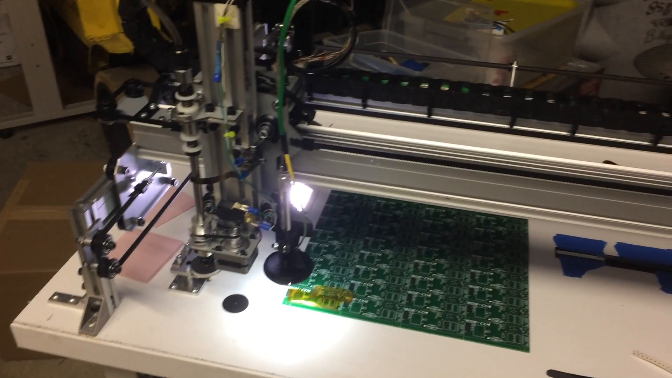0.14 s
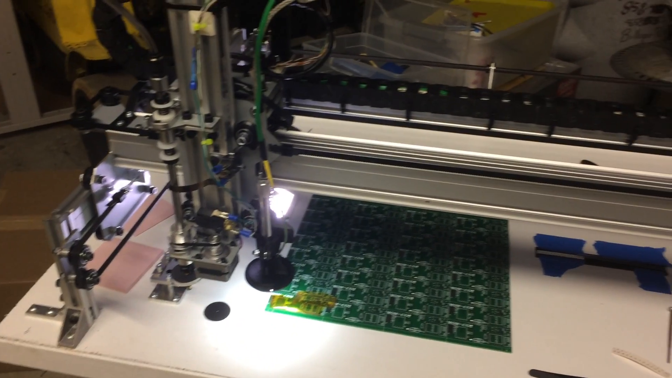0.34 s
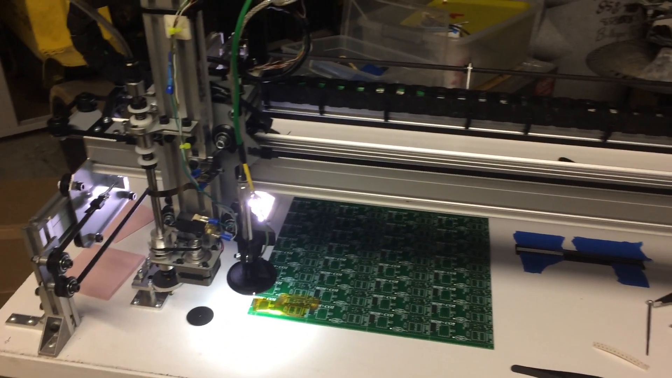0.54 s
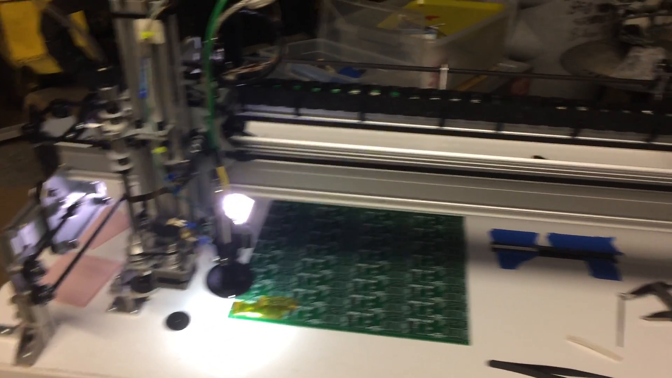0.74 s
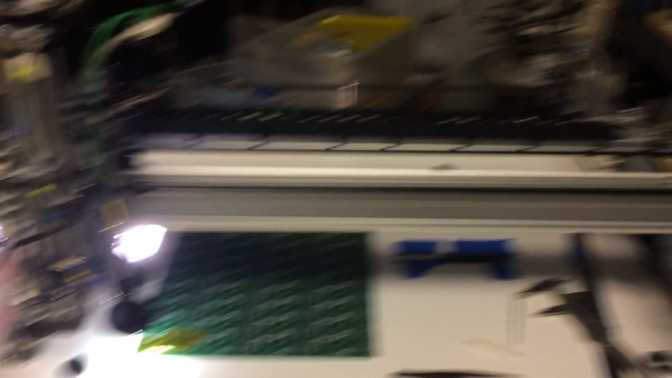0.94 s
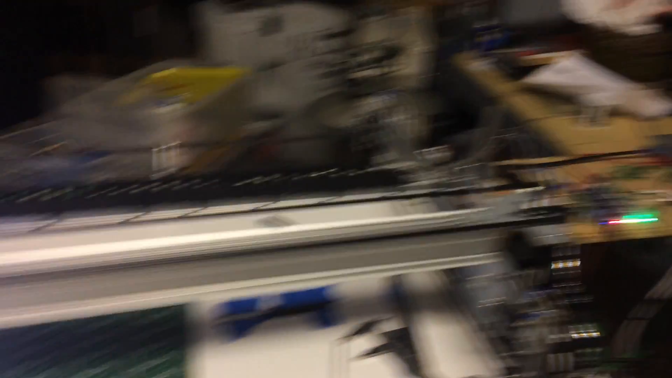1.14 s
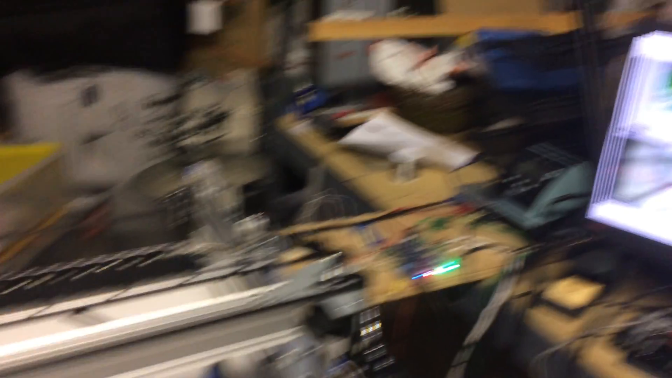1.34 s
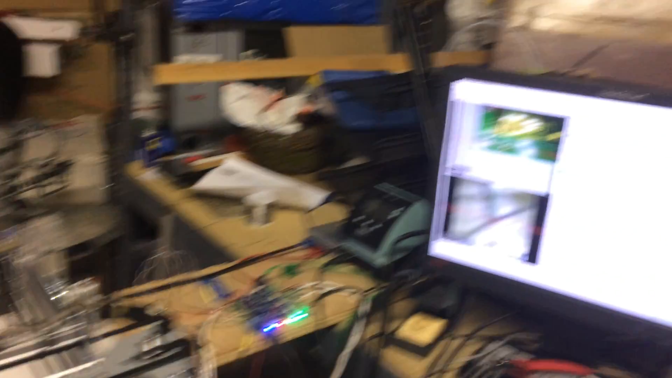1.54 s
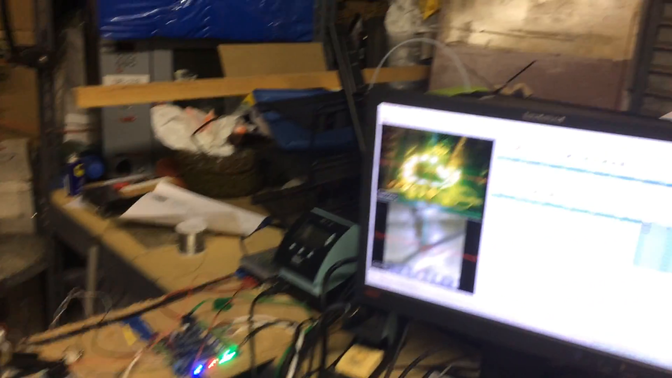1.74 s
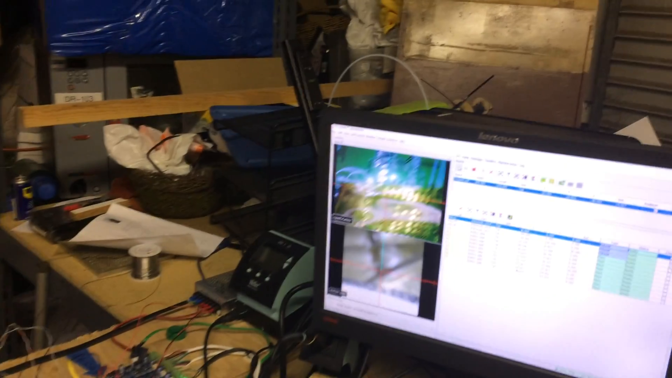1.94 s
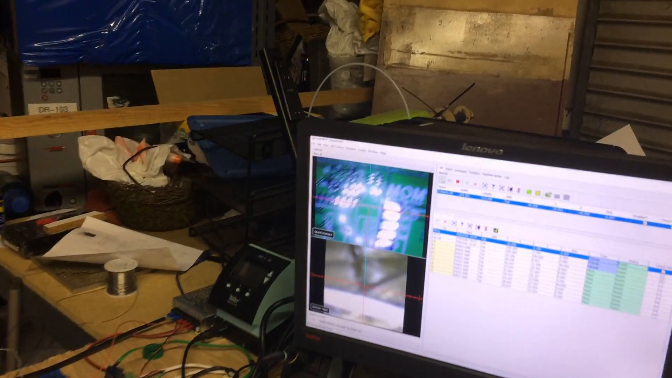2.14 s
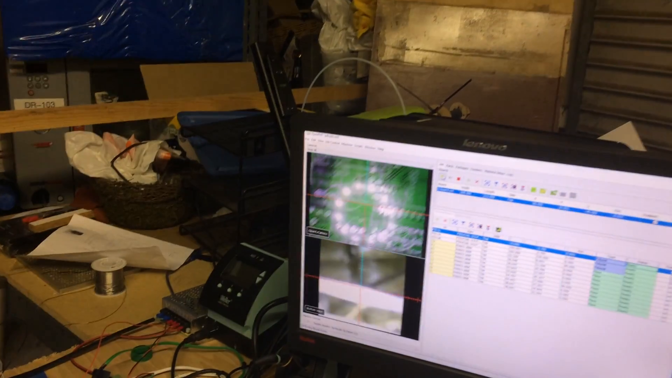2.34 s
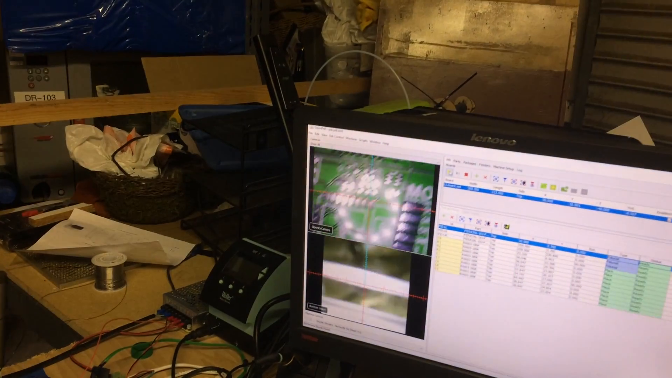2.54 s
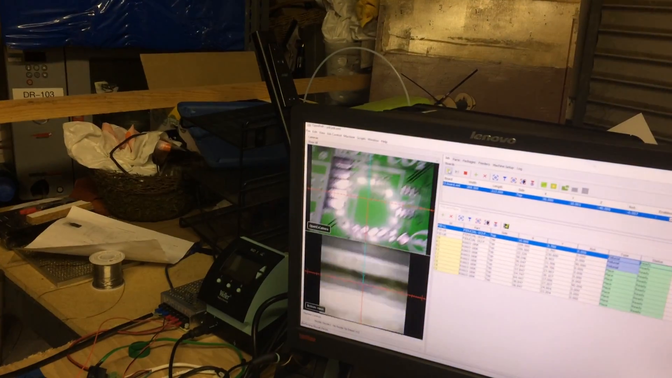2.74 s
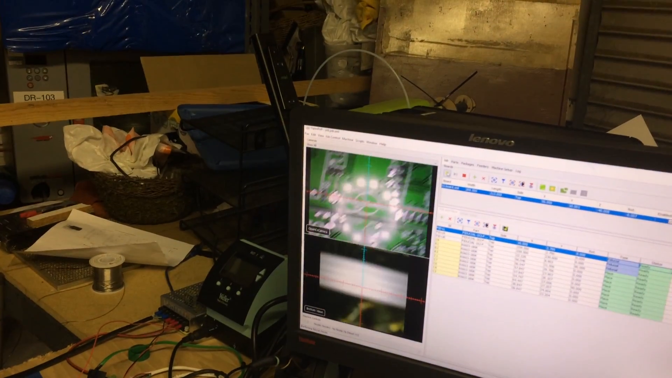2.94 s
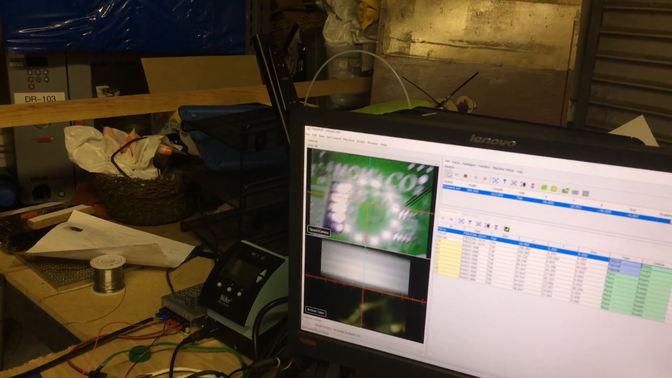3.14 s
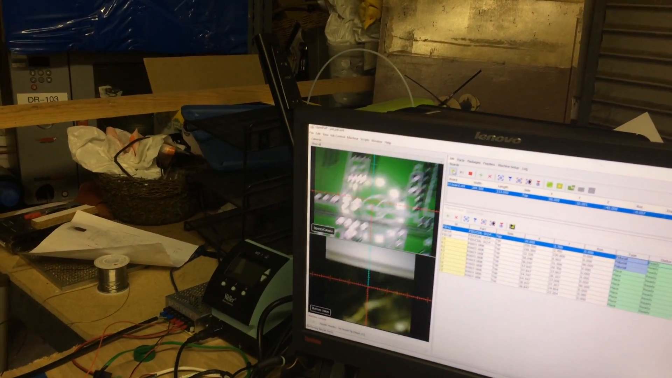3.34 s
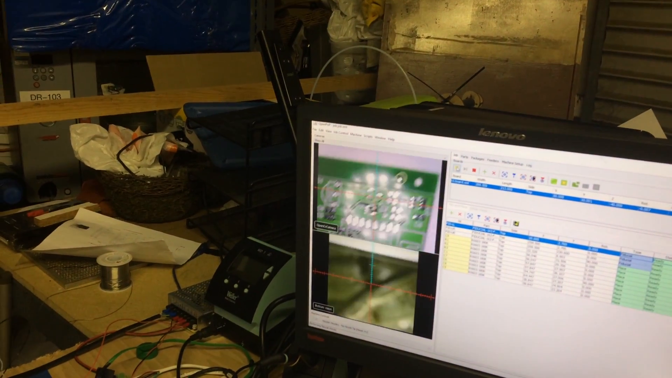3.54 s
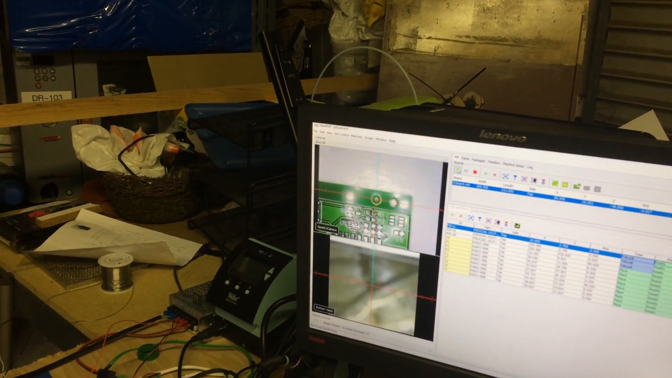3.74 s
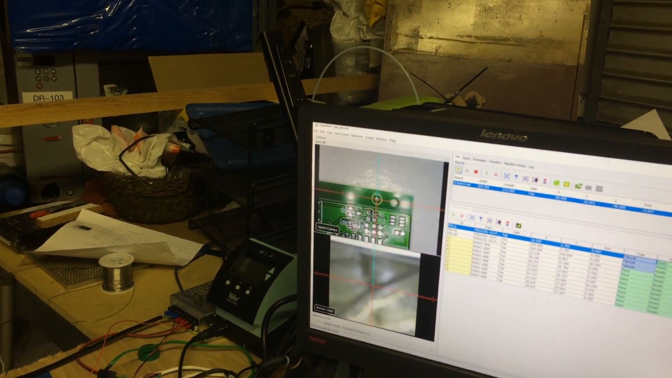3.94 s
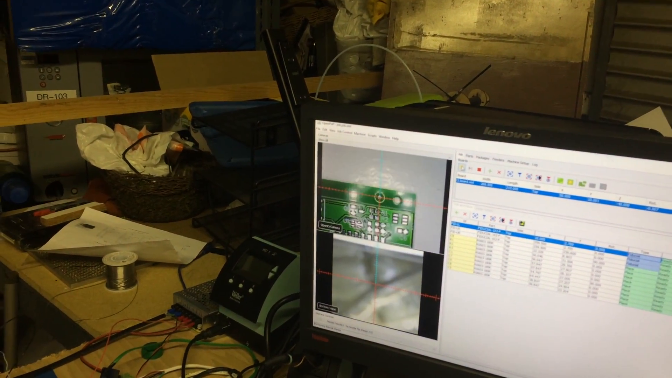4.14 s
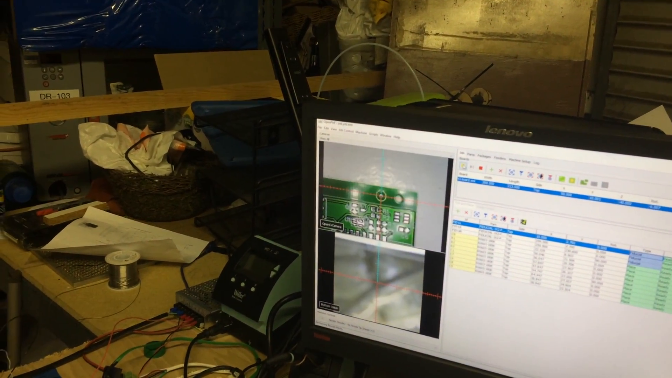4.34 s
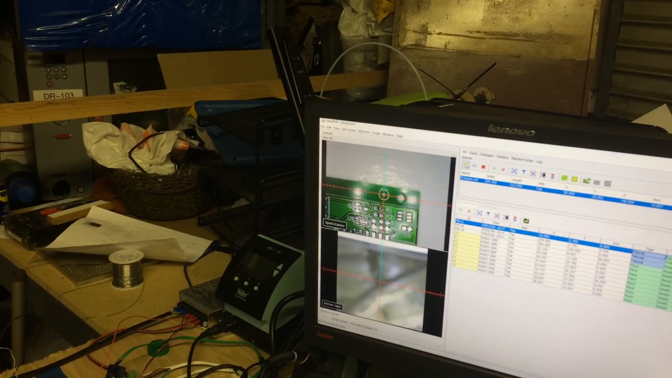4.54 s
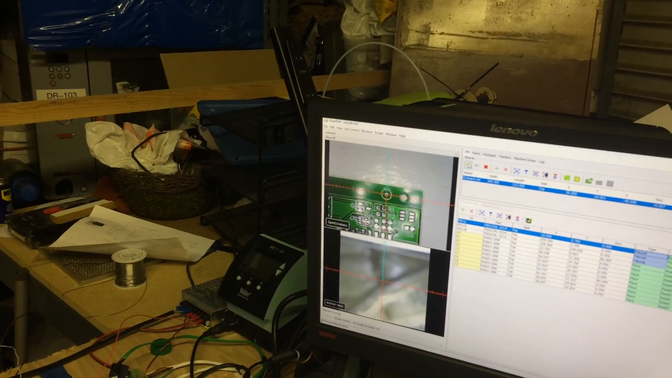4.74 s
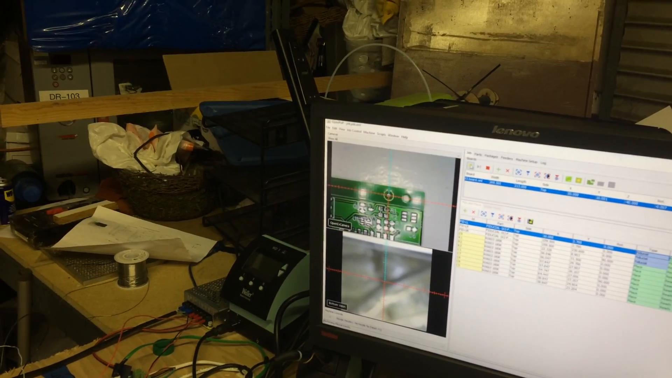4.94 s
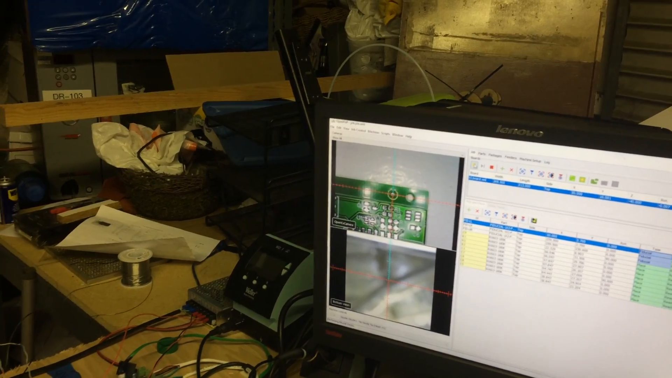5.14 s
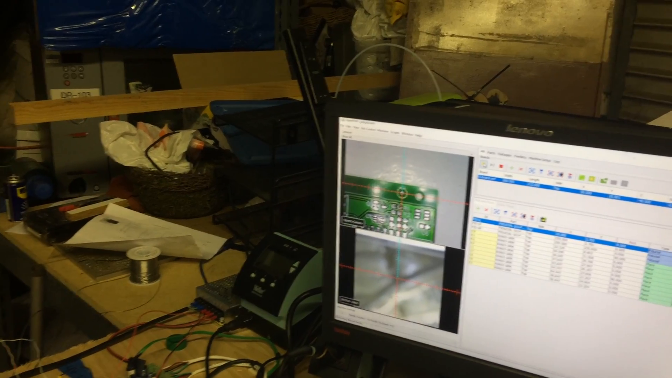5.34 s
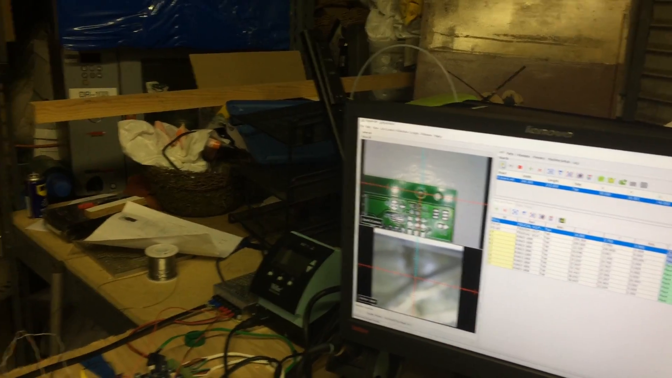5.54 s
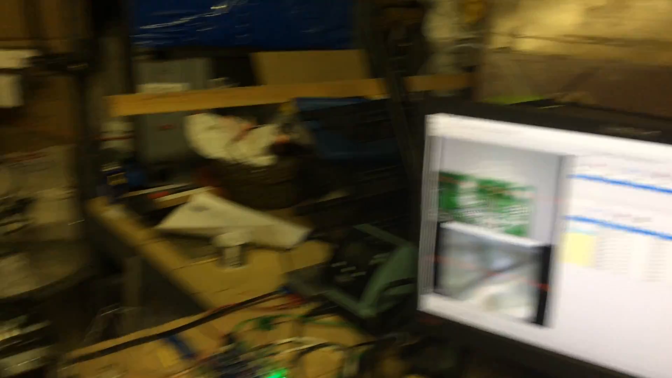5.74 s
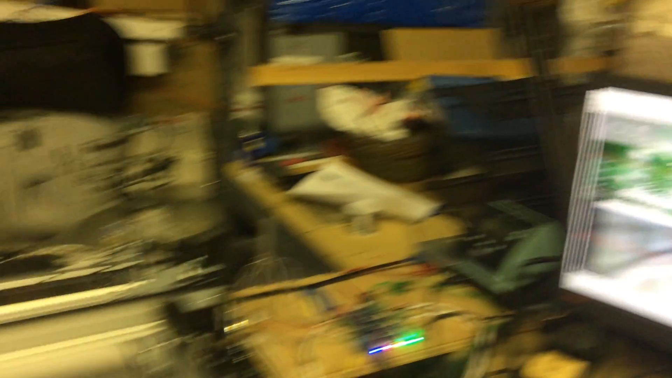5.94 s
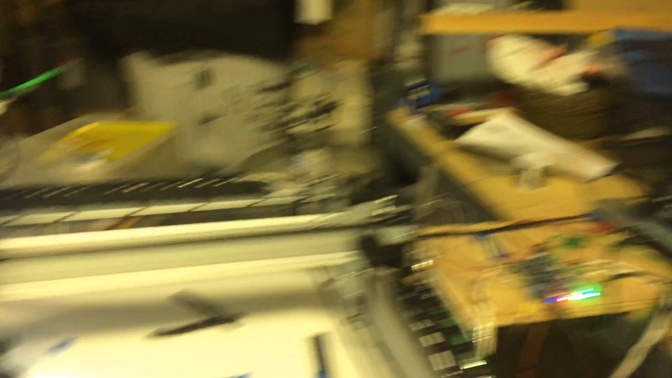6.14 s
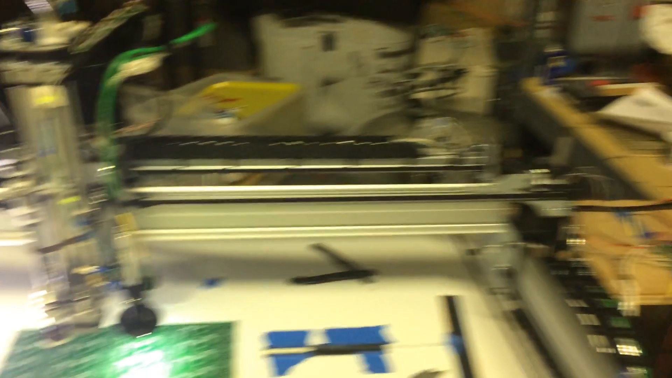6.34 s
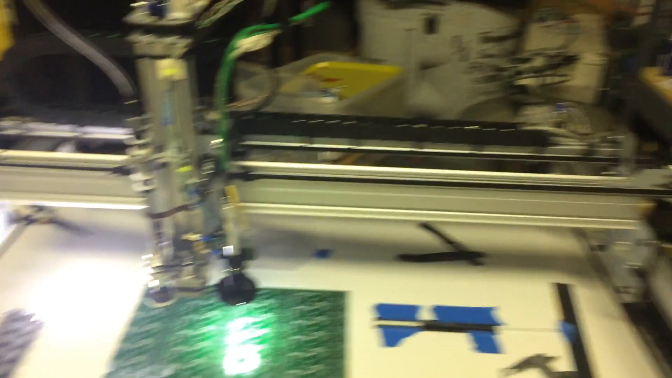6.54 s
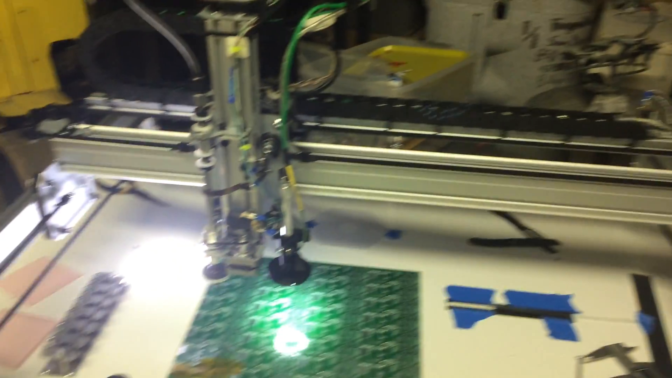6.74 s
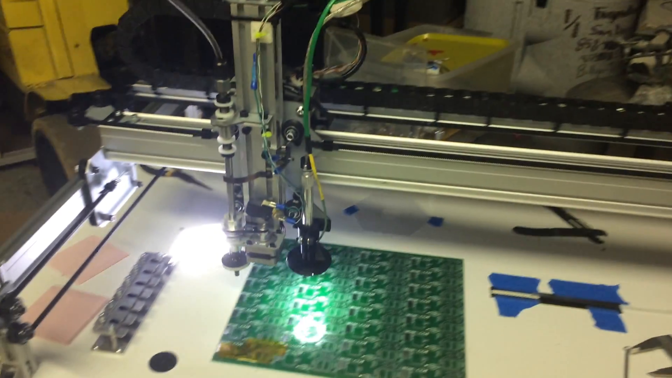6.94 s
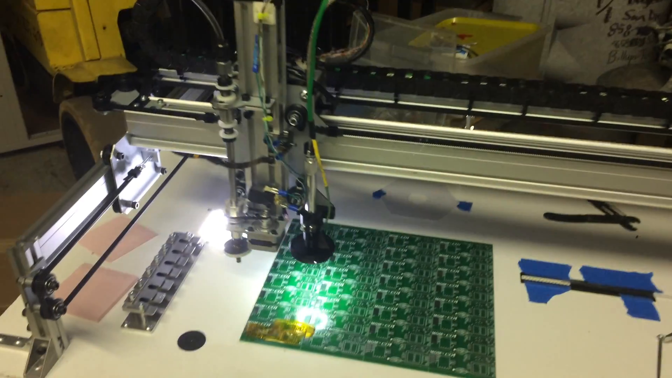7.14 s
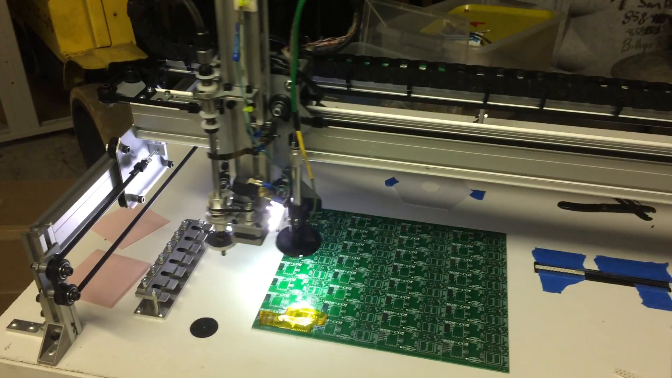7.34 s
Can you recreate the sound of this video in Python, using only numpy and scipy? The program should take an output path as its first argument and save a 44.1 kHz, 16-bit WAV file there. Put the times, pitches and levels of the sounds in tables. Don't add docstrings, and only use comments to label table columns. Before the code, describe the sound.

A small cluttered workshop with a throbbing pump hum and fan hiss. A tiny burst of motor steps and a few dry handling ticks come first. Then a gantry jerks into motion with a knock, its stepper motors gliding up to a bright, wavering whine over whirring bearings. It brakes, leaving a thin high whistle, then starts a second, longer whine that is cut off. Hand-held microphone nearby, slightly dull and lossy at the top.

```python
import sys
import numpy as np
from scipy import signal
from scipy.fft import rfft, irfft, next_fast_len
from scipy.io import wavfile
from scipy.ndimage import uniform_filter1d, map_coordinates

SR = 44100
rng = np.random.default_rng(int(sys.argv[2]) if len(sys.argv) > 2 else 0)


def dump_mix(stems):
    frames = np.atleast_2d(stems).T
    limited = np.clip(frames, -1, 1)
    pcm = np.round(limited * 32767).astype(np.int16)
    wavfile.write(sys.argv[1], SR, pcm)


def how_loud(loudness_db):
    steps = np.asarray(loudness_db, float) / 20
    return 10 ** steps


N = 326781
HOP = 32

# (start [s], full speed [s], braking [s], stop [s])
MOVES = [
    (1.507, 1.717, 3.385, 3.588),
    (5.65, 5.856, 9, 9.2),
]
# (share of direct, beat rate [Hz], in step at [s])
FIRST_STRONG = [
    [(1223.3, -46.6, -2.2), (0.32, -2.69, 2.56), (0.22, 2.41, 2.785), (0.53, 3.19, 2.304)],
    [(2446.5, -62.6, -7.4), (1.0, 0.76, 2.336), (0.4, 1.63, 2.24), (0.9, 0.46, 3.415)],
    [(9786.5, -69.1, 7.1), (0.34, 0.81, 2.06), (0.17, 3.29, 2.533), (0.2, 4.58, 2.444)],
    [(4893.2, -72.0, 8.0), (0.25, -1.86, 2.77), (0.35, 1.17, 2.705), (0.12, 4.05, 2.439)],
    [(1333.3, -58.3, -6.5), (0.7, -0.85, 2.428), (0.27, 1.71, 2.008), (0.24, 1.07, 2.474)],
    [(5333.2, -70.1, -6.8), (0.84, 1.21, 2.225), (0.31, 3.17, 2.589), (1.0, 0.9, 2.758)],
    [(3999.9, -73.8, -2.5), (0.28, -2.33, 2.686), (0.98, -3.33, 2.347), (0.97, -1.47, 2.463)],
    [(2666.6, -70.9, 6.6), (0.52, 1.52, 2.286), (0.21, 3.25, 2.584), (0.28, 0.84, 2.998)],
    [(6666.6, -71.4, 4.4), (0.65, -1.93, 2.144), (0.15, 1.25, 2.704), (0.45, 3.57, 2.408)],
    [(7999.9, -74.3, -4.5), (0.98, 2.27, 2.262), (0.34, -0.67, 3.05), (1.0, 2.41, 2.498)],
    [(3669.9, -73.1, 3.3), (0.5, -3.58, 2.289), (0.47, 0.63, 2.384), (0.64, 2.91, 2.554)],
]
SECOND_STRONG = [
    [(833.3, -62.0, 2.1), (0.87, 0.63, 7.175), (0.26, 2.51, 6.701), (0.33, -1.82, 6.83)],
    [(1666.7, -56.7, 0.2), (0.67, -0.72, 6.903), (0.4, -1.95, 6.192), (0.24, 2.43, 6.382)],
    [(6666.6, -61.3, -0.9), (0.58, 1.2, 6.672), (0.62, -1.13, 6.649), (0.79, -3.08, 6.976)],
    [(3333.3, -70.6, 5.7), (0.86, 0.95, 6.667), (0.33, 1.81, 6.649), (0.78, -1.13, 6.758)],
    [(1333.3, -53.5, 3.6), (0.57, -2.06, 6.483), (0.88, -1.05, 6.209), (0.95, -0.75, 6.888)],
    [(2500, -65.7, -4.1), (0.92, -0.51, 5.633), (0.17, 3.32, 6.667), (0.47, 1.74, 6.654)],
    [(2666.7, -68.2, 7.2), (0.1, 3.04, 6.858), (0.86, 0.57, 6.448), (0.55, -1.13, 6.622)],
    [(5333.2, -68.5, -1.4), (1.0, -0.82, 6.49), (0.66, 2.67, 6.563), (0.94, 1.61, 6.619)],
    [(4000, -74.7, -8.0), (0.53, -3.02, 6.96), (0.71, 1.89, 6.609), (0.44, -3.81, 6.327)],
    [(4166.7, -72.9, -8.0), (0.92, -1.9, 7.08), (1.0, -1.72, 7.39), (0.29, 2.85, 6.862)],
    [(5833.3, -73.6, -0.0), (0.66, 1.91, 6.653), (1.0, -0.88, 6.659), (0.35, -1.68, 6.679)],
    [(7500, -70.0, 0.7), (0.19, 3.45, 6.828), (0.83, 0.84, 6.527), (0.47, -1.73, 6.4)],
    [(8000, -72.3, -0.9), (0.66, -0.8, 6.738), (0.32, -3.49, 6.486), (0.76, 1.34, 6.752)],
    [(7111, -73.9, 7.2), (0.99, 0.83, 6.734), (0.59, -3.42, 6.442), (1.0, -0.92, 6.215)],
]
# (levels speeding up [dB], levels braking [dB])
LOADED = [
    [(-42.5, -57.5, -64, -70, -53, -62, -65, -65, -66, -64, -61),
     (-41, -58.5, -67.5, -70, -49, -57, -60, -62, -80, -74, -59)],
    [(-69, -64, -62, -61, -47, -71, -60.5, -61.5, -71, -66.5, -73, -76, -79, -74, -65), [-60] * 15],
]
# (pitch [Hz], level [dB rms])
WEAK_TONES = [
    [(917, -62.0), (1664, -72.0), (5821, -72.5), (6169, -76.5), (7060, -74.0), (7154, -68.5), (7328, -73.0),
     (8485, -77.5), (8564, -75.5), (8659, -81.0), (9176, -76.0), (9990, -80.5), (10094, -82.0),
     (10326, -82.0), (10399, -83.5)],
    [(1042, -71.5), (1250, -66.5), (2300, -74.0), (2917, -74.5), (3112, -70.5), (3669, -71.0),
     (4668, -77.5), (4778, -77.0), (5000, -71.5), (5133, -76.5), (6465, -71.5), (6875, -73.5),
     (7068, -73.0), (8333, -71.0), (8447, -72.5), (8667, -76.0), (9166, -71.5), (9334, -83.5),
     (9374, -88.0), (9561, -86.5), (9780, -77.5), (9998, -77.5), (10198, -87.5), (10333, -82.5)],
]
# (pitch [Hz], level [dB rms])
LOW_TONES = [
    [(305.8, -65), (198.5, -55.5)],
    [(405, -65.5), (203.2, -60.5)],
]
# (pitch [Hz], level [dB rms])
FAINT_TONES = [
    [(10657, -77.0), (11010, -77.5), (11323, -82.0), (11484, -87.5), (11659, -81.5), (11991, -82.0),
     (12236, -87.5), (12324, -82.0), (12791, -89.0), (12992, -82.0), (13324, -87.5), (13459, -91.0),
     (13655, -83.0), (13765, -88.5), (14070, -86.5), (14323, -83.5), (14817, -87.0), (14990, -86.0),
     (15287, -91.0)],
    [(10665, -79.0), (10832, -86.5), (10999, -84.0), (11111, -80.5), (11332, -75.0), (11665, -75.5),
     (11867, -85.0), (11999, -81.0), (12111, -84.5), (12334, -79.5), (12498, -87.5), (12665, -84.0),
     (12779, -87.0), (13000, -82.0), (13120, -87.0), (13333, -82.0), (13445, -85.5), (13664, -78.5),
     (13746, -86.5), (14113, -86.0), (14167, -88.5), (14336, -80.0), (14577, -85.0), (14782, -78.5),
     (14998, -79.5), (15207, -81.5)],
]
MICROSTEP_HZ = [
    [19573, 21333, 10666.6],
    [13333, 21333, 10666.6],
]
# (speeding up [dB], braking [dB])
MICROSTEP_DB = [
    [(-80, -69), (-87, -78), (-73, -74)],
    [(-76, -76), (-78, -80), (-62, -68)],
]
# (centre [Hz], width [Hz], level [dB])
FRAME = [(345, 17, -15), (1157, 330, 5), (1593, 163, 8.5), (2930, 1300, -1.5), (4730, 330, 4.5),
         (5150, 220, 7), (6030, 250, 3), (7300, 660, 3), (8480, 420, -5), (10700, 1210, -11)]
# (rumble [dB], whir [dB], hiss [dB], rattle at peak thrust [dB], starting jolt [dB])
ROLL = [
    (-51, -56.5, -56, -43, 1),
    (-58, -58, -56, -48, 11.5),
]
# (centre [Hz], width [Hz], level [dB])
BED = [(200, 10, -4), (305, 25, -5), (348, 16, 1), (400, 18, -5), (440, 25, -11), (260, 80, -17)]
# (centre [Hz], width [Hz], level [dB])
MOUNTS = [(4500, 570, -11.5), (5560, 95, 0.5), (5970, 34, 2), (7200, 480, -11.5), (8360, 350, -16)]
# (frequency [Hz], density [dB/Hz])
WHIR = [(300, -40), (480, -8), (900, -1), (1200, 2), (1600, 0.5), (2200, -9.5), (3000, -4), (4200, -23),
        (5500, -24)]
# (frequency [Hz], density [dB/Hz])
HISS = [(2500, -17), (3800, -1.5), (4600, -4), (5600, -3.5), (6500, -2), (7300, 0.5), (8600, -4.5),
        (10200, -9), (12500, -13.5), (15600, -15.5)]
# (time [s], peak [dB], pitch [Hz], t60 [s])
KNOCKS = [(1.517, -68, 345, 0.09), (1.536, -32.5, 345, 0.18), (1.585, -40, 318, 0.078),
          (1.614, -31.5, 335, 0.056), (1.625, -38.5, 201, 0.38), (3.538, -44, 1505, 0.086),
          (3.569, -38, 403, 0.13), (5.678, -40, 662, 0.05), (5.694, -34, 1080, 0.038),
          (5.649, -43, 388, 0.072), (5.674, -30.5, 400, 0.053)]
# (pitch [Hz], level [dB rms])
CHOPPER = [(2844, -69.5), (5700, -72), (8550, -71.5), (14223, -92), (7840, -75.5), (10707, -82.5),
           (13550, -79)]
# (pitch [Hz], level [dB rms])
EARLY_WHINE = [(8300, -81.5), (11800, -91), (3700, -92), (15190, -89)]
# (time [s], peak [dB], ring pitch [Hz], thud [dB])
JOG = [
    (0.5664, -52, 930, -13),
    (0.5941, -43, 1130, -11),
    (0.613, -41.5, 1146, -8),
    (0.626, -41, 1195, -5.5),
    (0.6336, -35, 1120, -15),
    (0.6497, -51, 1040, -1),
]
# (time [s], peak [dB], body [dB], brightness [dB])
CLICKS = [
    (1.143, -32.5, -16, -1),
    (1.2644, -54, -15, -2),
    (1.3047, -56, -15, 0),
    (1.329, -45.5, 11.5, -9),
    (1.342, -44, 2, -13),
    (1.416, -45, -14, -5),
    (1.433, -54, 7, 2),
]
# (time [s], level [dB])
RUMBLE = [(0.0, -52), (0.6, -49.5), (0.82, -52), (4.58, -53), (4.75, -50.5), (5.24, -54.5), (6.79, -51),
          (7.0, -54), (7.41, -48.5)]
# (frequency [Hz], density [dB/Hz])
LOWS = [(15, -20), (28, -26), (40, -10.5), (56, -4), (76, 4), (84, 3.5), (100, -1.5), (130, -8.5),
        (150, -11.5), (190, -10), (240, -24), (330, -20), (450, -50)]
# (frequency [Hz], density [dB/Hz])
FAN = [(150, -52), (250, -9.5), (315, -6), (378, -8.5), (825, -7), (910, -7.5), (1540, -8), (2690, -11.5),
       (2930, -13.5), (3110, -15), (3610, -10.5), (4600, -30.5), (5980, -83), (10100, -120)]
# (centre [Hz], width [Hz], level [dB])
HOUSING = [(852, 37, 2.5), (3404, 85, 0), (3683, 100, -2.5)]
# (frequency [Hz], density [dB/Hz])
TOP = [(2350, -48), (4000, -11), (4830, -7), (5410, -1), (6990, -6), (7190, -7), (8880, -13.5), (9780, -15),
       (11000, -19), (15600, -19)]
# (frequency [Hz], density [dB/Hz])
TOP_AWAY = [(2500, -34), (4000, -6.5), (5000, -9), (5700, 1), (6800, -9.5), (8500, -5.5), (9300, -14.5),
            (10400, -20.5), (12500, -14.5), (13700, -29), (14300, -34), (15300, -38)]
# (frequency [Hz], t60 [s])
SHOP = [(200, .25), (1500, .2), (6000, .15), (12000, .1)]
# (frequency [Hz], margin [dB])
MASKED = [(5500, -40), (6800, -2.8), (8300, -3.2), (9400, -1.3), (10300, -1.4), (11300, -2.2),
          (12500, -1.7), (14500, -1.6)]


def motors(move, strong_hz, strong_db, loaded, tones, microsteps):
    share = speed(*move)
    on = np.flatnonzero(share > 0)
    ramp = np.clip(16 * (1 - share), 0, 1)
    jitter = 0.00032 * wobble(40) + 0.015 * ramp * wobble(160)
    turns = np.cumsum(share * (1 + jitter))[on] / SR
    at, pace, load = np.arange(0, N, HOP), share[::HOP], ramp[::HOP]
    braking = at / SR > move[2]
    grid = np.arange(0, SR / 2, 10)
    frame = abs(resonant(FRAME)(grid)) + how_loud(-57)

    orders = []
    for hz, db, up_db, down_db in zip(strong_hz, strong_db, *loaded):
        orders.append((hz, (1 - load) * db + load * np.where(braking, down_db, up_db)))
    for hz, db in tones:
        orders.append((hz, drifting(db - 3 - 5.5 * load, pace == 1)))
    for hz, (up_db, down_db) in microsteps:
        orders.append((hz, np.where(braking, down_db, up_db) - 40 * (1 - load)))

    out = np.zeros(N)
    for hz, db in orders:
        colour = np.interp(hz * pace, grid, frame) / np.interp(hz, grid, frame)
        db = db + load * (5.5 * wobble(45, HOP) - 0.5)
        level = np.interp(on, at, how_loud(db + 6.5) * colour * pace ** 0.82)
        out[on] += level * np.sin(2 * np.pi * (hz * turns + rng.random()))
    return (1 - ramp) * out + echoes(ramp * out, wet=0.31)


def speed(start, full, brake, stop):
    t = np.arange(N) / SR
    u = np.clip(np.minimum((t - start) / (full - start), (stop - t) / (stop - brake)), 0, 1)
    return u * u * (3 - 2 * u)


def swells(move, tones):
    t = np.arange(0, N, HOP) / SR
    middle = (move[1] + min(move[2], N / SR)) / 2
    levels = []
    for (hz, db, drift), *reflections in tones:
        total = 1
        for share, beat_hz, in_step_s in reflections:
            total = total + share * np.exp(2j * np.pi * beat_hz * (t - in_step_s))
        beats_db = 20 * np.log10(abs(total) + 0.01)
        levels.append(1.9 + db + drift * (t - middle) + beats_db)
    return levels


def drifting(db, moving):
    swing = np.clip(9 * wobble(5, HOP), -14, 4)
    return db + swing - 10 * np.log10(np.mean(how_loud(2 * swing[moving])))


def carriages():
    out, t = np.zeros(N), np.arange(N) / SR
    for move, (rumble_db, whir_db, hiss_db, rattle_db, jolt_db) in zip(MOVES, ROLL):
        start, _, brake, stop = move
        share = speed(*move)
        crawl = 1 - share
        thrust = (4 * share * crawl) ** 0.99
        braking = t > brake
        gate = np.interp(t, [start, start + 0.023, stop + 0.024, stop + 0.092], [0, 1, 1, 0])
        gate = gate * how_loud(-3 * braking * crawl - 70 * np.clip(t - stop, 0, 1))

        jolt = jolt_db * np.exp(-abs(t - start) / 0.27)
        rumble = unit(filtered(rng.standard_normal(N), lambda f: resonant(BED)(f) * (f < 480)))
        rumble = how_loud(rumble_db + (4.5 + 1.5 * braking) * crawl + jolt) * rumble
        whir = how_loud(whir_db + 5 * crawl ** 3) * rush(WHIR, flutter_db=1)
        hiss_level = hiss_db + 3.5 * thrust - 8.5 * crawl ** 2 + 0.22 * wobble(6)
        hiss = how_loud(hiss_level) * rush(HISS, flutter_db=1)
        rattle = unit(filtered(rng.standard_normal(N) * how_loud(2.4 * wobble(90)), resonant(MOUNTS)))
        rattle = how_loud(rattle_db - 3.5 * braking + 11.5 * (thrust - 1)) * np.clip(4 * crawl, 0, 1) * rattle
        out += gate * (rumble + whir + hiss + rattle)
    return out + knocks()


def knocks():
    out, t = np.zeros(N), np.arange(SR // 5) / SR
    for s, db, hz, t60 in KNOCKS:
        envelope = how_loud(db + 1.5 - 60 * t / t60) * (1 - np.exp(-t / 0.0026))
        out[round(s * SR):][:len(t)] += envelope * np.sin(2 * np.pi * hz * t)
    return out


def drivers():
    t = np.arange(N) / SR
    held = np.interp(t, [3.6, 3.65, 5.64, 5.66], [0, 1, 1, 0])
    drift = np.cumsum(1 + 0.00086 * wobble(9)) / SR

    def whistle(lines):
        return sum(how_loud(db + 5 + 1.5 * wobble(15)) * np.sin(2 * np.pi * hz * drift) for hz, db in lines)

    return held * whistle(CHOPPER) + (t < MOVES[0][0]) * whistle(EARLY_WHINE)


def jog():
    out, t = np.zeros(N), np.arange(SR // 10) / SR
    thud = np.sin(2 * np.pi * 440 * t) + 0.82 * np.sin(2 * np.pi * 285 * t)
    for s, db, hz, thud_db in JOG:
        attack = (1 - np.exp(-t / 0.0029)) * how_loud(db + 4.5)
        ring = how_loud(-60 * t / 0.033) * np.sin(2 * np.pi * hz * t)
        out[round(s * SR):][:len(t)] += attack * (ring + how_loud(thud_db - 60 * t / 0.069) * thud)
    return out


def clicks():
    out, t = np.zeros(N), np.arange(2000) / SR
    body = resonant([(534, 99, 2.5), (1340, 500, -6.5)])
    for s, db, body_db, bright_db in CLICKS:
        snap = np.sign(rng.standard_normal(len(t))) * how_loud(db - 0.5 - 60 * t / 0.0015)
        snap += how_loud(db + 15) * (t == 0)
        push = how_loud(db + body_db + 30.5) * (t == 0)
        shell = resonant([(2400, 1000, -bright_db), (4540, 920, 1.4), (9300, 5200, 2.5 + bright_db)])
        out[round(s * SR):][:len(t)] += filtered(snap, shell) + filtered(push, body)
    return out


def workshop():
    t = np.arange(N) / SR
    rumble_db, = curves(RUMBLE)
    rumble = how_loud(rumble_db + 4) * rush(LOWS, flutter_db=0)
    fan = how_loud(-58 + 1.1 * wobble(2.22)) * rush(FAN, flutter_db=1)
    housing = sum(how_loud(3.2 * wobble(12)) * filtered(rng.standard_normal(N), resonant([mode])) for mode in HOUSING)
    facing = how_loud(-68.5) * rush(TOP, flutter_db=1)
    away = how_loud(-66) * rush(TOP_AWAY, flutter_db=0)
    top = np.where(t < 1.5, facing, away)
    return rumble + pump() + fan + how_loud(-67) * unit(housing) + top


def pump():
    t = np.arange(N) / SR - 0.04
    turn = 2 * np.pi * 117.55 * t + 0.52 * wobble(2.97)
    hum = how_loud(0.98 * wobble(2.17)) * np.sin(turn) + how_loud(-6) * np.sin(turn / 2)
    mains = how_loud(-4.5 + 0.54 * wobble(2.02)) * np.sin(2 * np.pi * 119.99 * t)
    return how_loud(-50.9) * (hum + mains)


def echoes(x, wet):
    hz, t, z = signal.stft(rng.standard_normal(SR // 3), SR, nperseg=256)
    t60 = np.interp(hz, *np.transpose(SHOP))[:, None]
    tail = signal.istft(z * how_loud(-60 * t / t60), SR, nperseg=256)[1]
    tail = tail / np.linalg.norm(tail)
    return np.sqrt(1 - wet) * x + np.sqrt(wet) * signal.fftconvolve(x, tail)[:N]


def rush(points, flutter_db):
    hz, db = np.transpose(points)
    noise = rng.standard_normal(N) * how_loud(flutter_db * wobble(25))
    return unit(filtered(noise, lambda f: how_loud(np.interp(np.log(f + 1), np.log(hz), db))))


def resonant(modes):
    def response(f):
        total = 0
        for k, (centre, width, db) in enumerate(modes):
            peak = 1j * f * width / (centre * centre - f * f + 1j * f * width)
            total = total + (-1) ** k * how_loud(db) * peak
        return total
    return response


def filtered(x, response):
    m = next_fast_len(len(x) + 8192)
    return irfft(rfft(x, m) * response(np.fft.rfftfreq(m, 1 / SR)), m)[:len(x)]


def wobble(rate, hop=1):
    coarse = np.arange(0, N + 64, 64)
    knots = rng.standard_normal(int(N * rate / SR) + 4)
    return np.interp(np.arange(0, N, hop), coarse, map_coordinates(knots, [coarse * rate / SR]))


def curves(rows):
    s, *cols = np.transpose(rows)
    return [np.interp(np.arange(N) / SR, s, c) for c in cols]


def unit(x):
    return x / np.sqrt(np.mean(x ** 2) + 1e-20)


def scene():
    strong_hz, strong_db = [], []
    for move, tones in zip(MOVES, (FIRST_STRONG, SECOND_STRONG)):
        strong_hz.append([row[0][0] for row in tones])
        strong_db.append(swells(move, tones))
    strong_hz[1].append(333.3)
    strong_db[1].append(strong_db[1][4] - 17.5)

    mix = carriages() + drivers() + jog() + clicks() + workshop()
    for k, move in enumerate(MOVES):
        tones = [*WEAK_TONES[k], *LOW_TONES[k], *FAINT_TONES[k]]
        microsteps = zip(MICROSTEP_HZ[k], MICROSTEP_DB[k])
        mix = mix + motors(move, strong_hz[k], strong_db[k], LOADED[k], tones, microsteps)
    return mix[None]


def masking(x):
    hz, _, z = signal.stft(x, SR, nperseg=1024)
    level_db = uniform_filter1d(20 * np.log10(abs(z) + 1e-9), size=7, axis=1)
    patch = uniform_filter1d(level_db, size=4, axis=0)
    around = uniform_filter1d(level_db, size=30, axis=0)
    covered = patch < around + np.interp(hz, *np.transpose(MASKED))[:, None]
    faint = (patch < -105.5) & (hz > 13750)[:, None]
    return signal.istft(np.where(covered | faint, 0.05, 1) * z, SR, nperseg=1024)[1][:N]


def top_cut(x):
    return signal.sosfilt(signal.butter(12, 15990, fs=SR, output="sos"), x)


def record(dry):
    band = filtered(dry[0], lambda f: f < 15330)
    return top_cut(masking(band)[None])


dry = scene()
out = record(dry)
dump_mix(out)
```